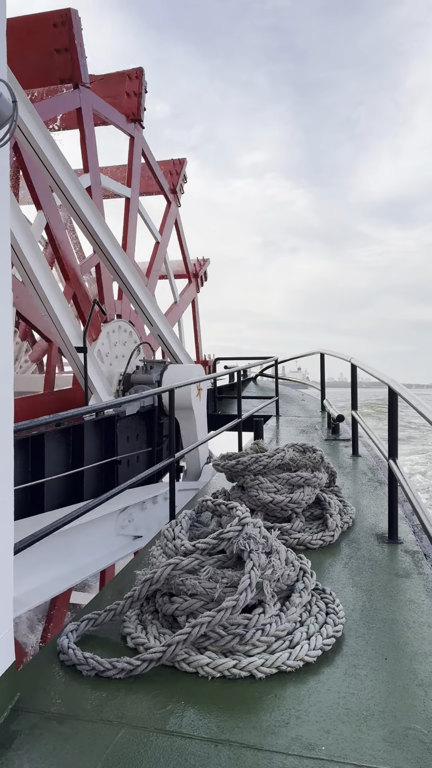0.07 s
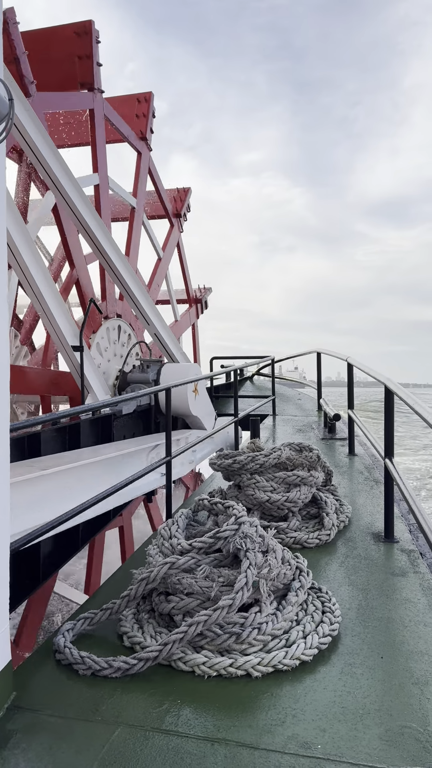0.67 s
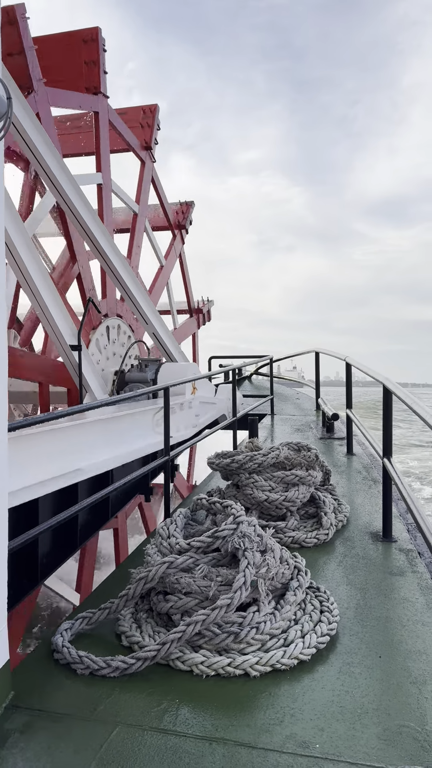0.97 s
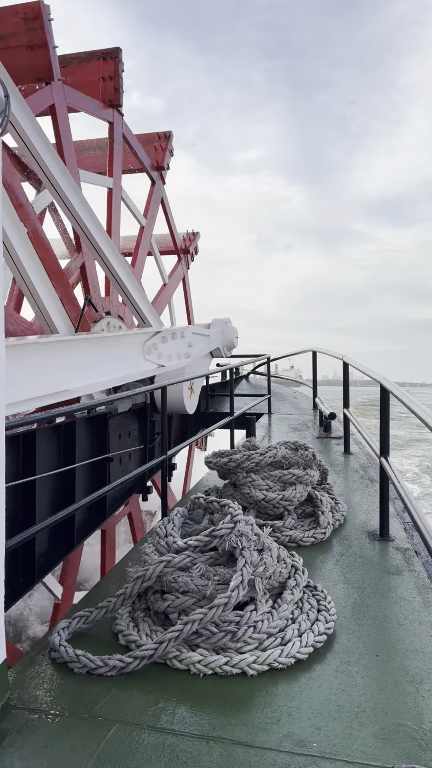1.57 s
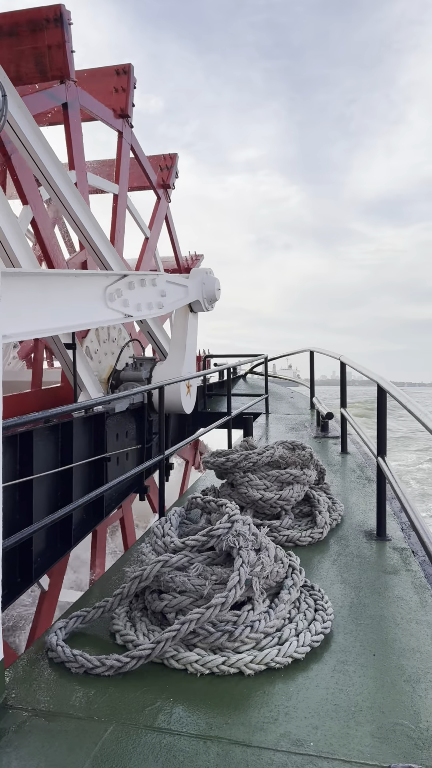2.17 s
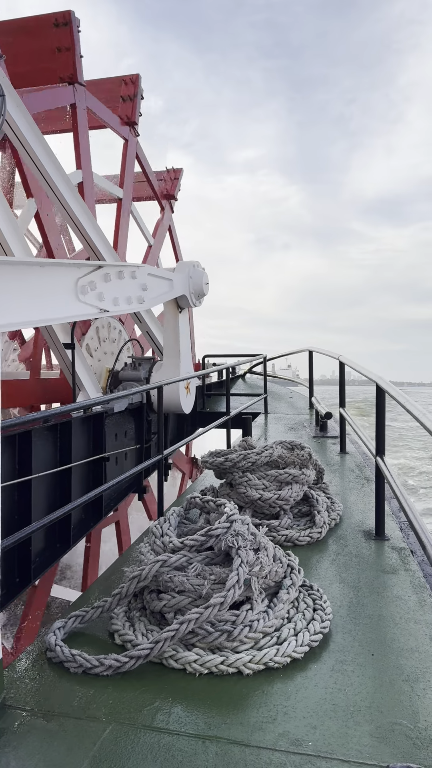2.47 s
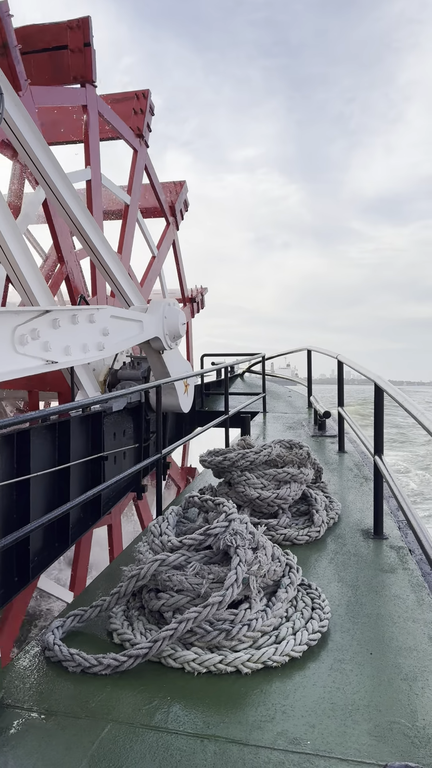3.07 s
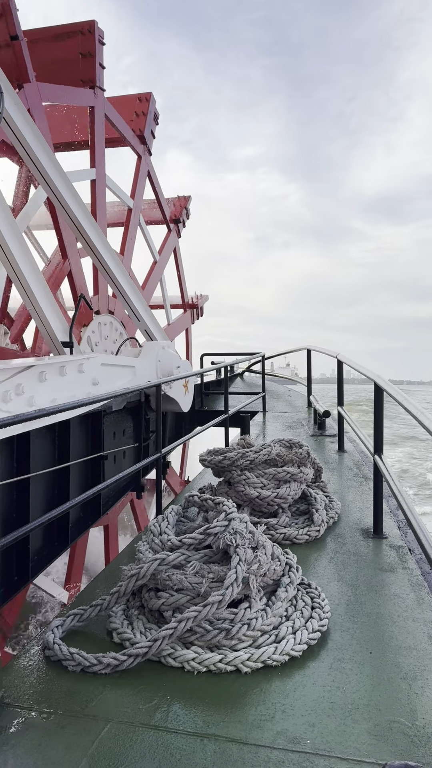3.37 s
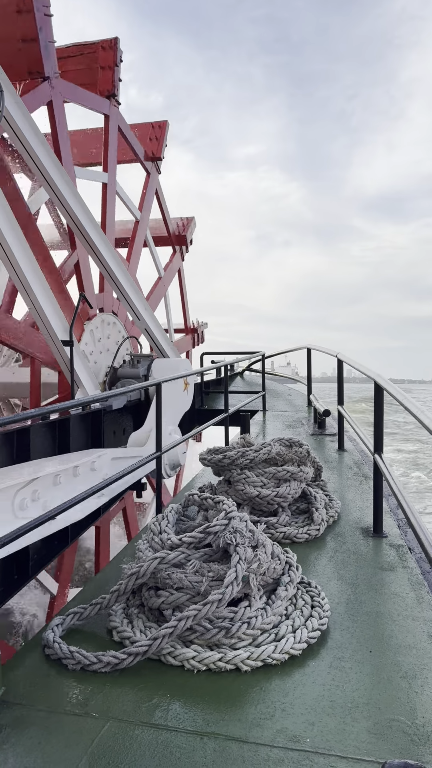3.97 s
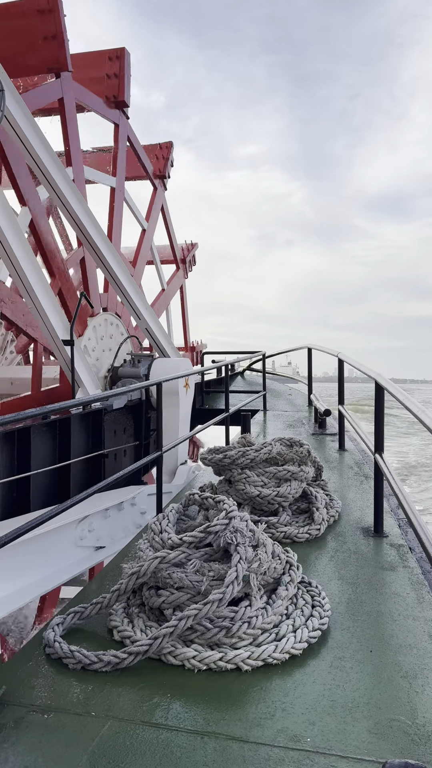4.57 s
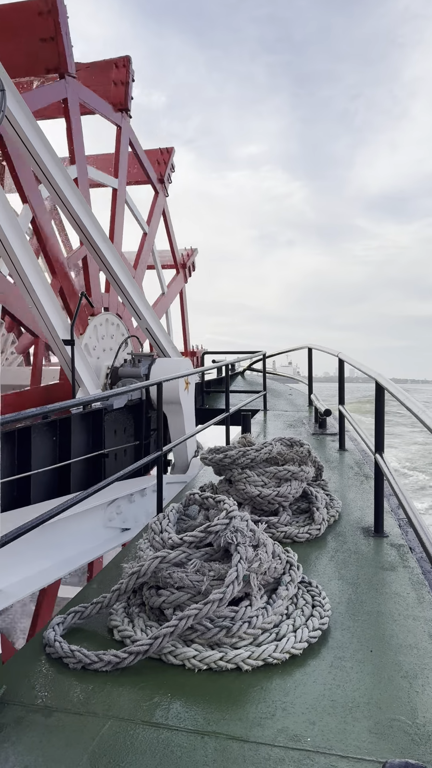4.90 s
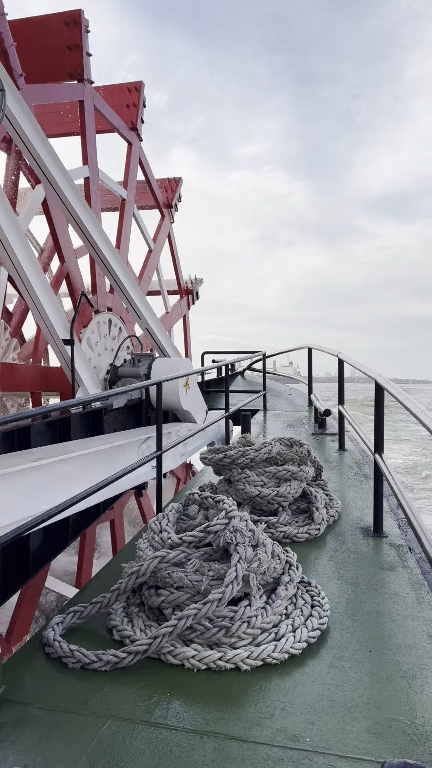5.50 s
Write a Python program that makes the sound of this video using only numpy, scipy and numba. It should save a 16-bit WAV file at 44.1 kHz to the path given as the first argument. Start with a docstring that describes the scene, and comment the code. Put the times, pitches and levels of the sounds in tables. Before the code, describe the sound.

Water rushes, gurgles and sprays without pause as a paddlewheel turns beside the deck of a riverboat, swelling gently with each board, roughly three a second. Gusts rumble and pop on a phone microphone outdoors, peaking about two thirds of the way through. A low engine drone runs below and drops back near the end, while a faint high ring surfaces now and then.

```python
"""A riverboat's paddlewheel, heard from the stern deck, slaps the river about three times a second.
Its boards plunge with a low gurgle, churn up a wash of resonating bubbles and throw a hissing spray;
a thin ring comes and goes. The hull carries the low drone of the machinery.
Gusts buffet the phone with turbulent pressure, and small eddies flutter and pop at its two ports."""
import sys
import numpy as np
from scipy import signal
from scipy.fft import rfft, irfft
from scipy.io import wavfile
from scipy.ndimage import uniform_filter1d
from numba import njit

SR = 44100
rng = np.random.default_rng(int(sys.argv[2]) if len(sys.argv) > 2 else 0)


def to_wav(s):
    """Save 16-bit WAV."""
    ch = np.atleast_2d(s).T  # columns
    pcm = np.round(np.clip(ch, -1, 1) * 32767)  # PCM
    wavfile.write(sys.argv[1], SR, pcm.astype(np.int16))


N = 253134
TIME = np.arange(N) / SR
FREQ = np.fft.rfftfreq(N, 1 / SR)

# Board slaps: t/s, wash swell/dB, spray swell/dB, spray swell of the first sheet of water/dB
BOARD_SLAPS = [(.3, 3, 0.6, 0.5), (.61, 2, 0.7, .6), (.98, 3, 1.5, 2), (1.32, 1.5, 1.5, 1.8),
               (1.7, 2, 1.4, 1), (2.02, 2.4, 1.2, 2), (2.37, 2, 2, 1.48), (2.72, 2, 2.3, 1),
               (3.05, 2, 2, 1.9), (3.39, 1.7, 1.8, 1.5), (3.76, 2.7, 0.6, 1.5), (4.09, 2.5, 0.5, -0.5),
               (4.385, 1.8, 2, -0.05), (4.75, 3, 1.6, 0), (5.08, 2.5, 0.5, 2), (5.42, 3, 2, 0.5),
               (5.68, 2, 2, -0.5)]
# Steady churn between strokes: t/s, wash level/dB, spray level/dB
CHURN_LEVELS = [(0, -35, -32.7), (1, -35, -32.5), (2.2, -35, -33), (3.1, -34.5, -33), (3.9, -34.5, -32.5),
                (4.5, -34.5, -32.5), (5.1, -36, -33.5), (5.74, -36, -32.5)]
# Low gurgle within the wash: t/s, gain/dB
GURGLE_GAIN = [(0, 0.5), (0.3, -7), (0.6, 1.5), (3.85, 0), (4.1, -2), (4.22, -1), (4.33, 0.5), (4.8, 1),
               (4.88, -2), (5.42, -0.5), (5.56, -4.5), (5.7, 1)]
# Spectra of the water: f/Hz, relative spectral level/dB
WASH_SPECTRUM = [(60, -37), (250, -6), (500, 1), (780, -1.9), (1050, -0.8), (1400, -3), (2000, -6),
                 (2750, -6), (3600, -10.5), (6000, -24.5), (12000, -49)]
SPRAY_SPECTRUM = [(1500, -25), (2800, -11), (3700, -3), (5000, -1.3), (6000, -.3), (7400, 0), (9200, -3.2),
                  (10500, -.3), (12000, -2), (13500, -5), (15000, -3.8), (17000, -6)]
PLUNGE_SPECTRUM = [(130, -12), (240, 4), (320, 3.5), (480, -2.5), (750, -13.5), (1100, -15), (1600, -26),
                   (3000, -65)]
# The wheel's sound at the two ports: f/Hz, coherence (0-1), phase lead of the left port/rad
PORT_COHERENCE = [(100, .9, 0), (500, .65, .4), (800, .65, .6), (1030, .6, -.4), (1300, .8, .2),
                  (2000, .97, 0), (2750, .55, 1.5), (3400, .28, 0), (4700, .28, 0), (5600, .82, -.55),
                  (9200, .82, -2.1), (11000, .97, -3.05), (13200, .96, -3.2), (15600, .78, -4.6)]
# Machinery lines: f/Hz, base rms level/dB, share of the heard level change followed (0-1)
ENGINE_LINES = [(87.4, -28, 1), (112.5, -38, 0.46), (133.9, -38, 0.5), (177.4, -33, 1), (271.6, -38, 1),
                (349.5, -40.5, 0.8)]
# Level of the drone as heard at the phone, dipping late: t/s, gain/dB
HEARD_DRONE_LEVEL = [(0, -1), (1.2, -0.5), (3.9, 3.5), (4.3, -7.5), (5.35, -7.5), (5.55, -11),
                     (5.74, -10.5)]
# Wind on the phone: t/s, relative buffeting level/dB
BREEZE_LEVEL = [(0, -47), (.15, -20.5), (.45, -18.5), (.62, -21), (.8, -25.5), (.92, -21.5), (1.2, -18),
                (1.65, -19), (1.95, -17), (2.15, -20), (2.35, -18), (2.7, -18), (3.35, -19), (3.7, -18.5),
                (4.02, -17.5), (4.15, -20.5), (4.19, -38), (4.3, -24.5), (4.5, -25.5), (5.2, -30.5),
                (5.4, -31.5), (5.57, -33.5), (5.65, -24), (5.74, -17)]
# Gusts and low swells: centre t/s, duration/s, relative level of wind buffets/dB, of plunging boards/dB
GUSTS_AND_PLUNGES = [(0.15, 0.0442, -22, -27), (0.412, 0.057, -23.5, -47), (0.617, 0.0654, -35.5, -25.5),
                     (0.977, 0.072, -20, -26), (1.145, 0.034, -18.5, -46), (1.292, 0.057, -14, -27),
                     (1.45, 0.1, -19.5, -36), (1.625, 0.095, -17.5, -30), (2.003, 0.062, -16, -33),
                     (2.537, 0.079, -20, -30), (2.827, 0.048, -19, -40), (3.088, 0.041, -24, -28),
                     (3.387, 0.066, -23, -22), (3.486, 0.07, -15.5, -21), (3.624, 0.04, -20.5, -30),
                     (3.774, 0.11, -11.5, -23), (3.905, 0.06, -15, -24.5), (4.049, 0.04, -20, -31),
                     (4.119, 0.042, -11.5, -30.5), (4.3, 0.04, -30, -26), (4.396, 0.043, -31.5, -25),
                     (4.591, 0.07, -18, -30), (4.666, 0.042, -18, -23.5), (4.741, 0.059, -19.5, -45),
                     (4.853, 0.023, -29.5, -27.5), (4.929, 0.025, -19, -25), (4.978, 0.038, -20.5, -29),
                     (5.124, 0.022, -17.5, -40), (5.186, 0.014, -24, -34), (5.275, 0.03, -23, -28.5),
                     (5.39, 0.05, -27, -46)]
# Spectra of the airflow: f/Hz, relative spectral level/dB
BUFFET_SPECTRUM = [(15, -40), (24, -27), (36, -1.5), (55, 3), (85, 1), (135, 1.5), (190, -3.5),
                   (250, -11.5), (400, -21.5), (900, -91)]
WHIRL_SPECTRUM = [(120, -4), (220, 0), (290, 6.5), (380, -1.5), (500, -6), (800, -8), (1400, -29),
                  (3000, -66)]
EDDY_SPECTRUM = [(20, -35), (40, -14), (65, 3.5), (160, 3), (260, 1.5), (450, -2.5), (800, -7),
                 (1200, -21.5), (1900, -61.5)]
# Eddy flurries: centre t/s, duration/s, relative level of slow eddies/dB, of quick eddies/dB
FLURRIES = [(0.36, 0.17, -21, -29), (0.53, 0.08, -27, -32), (1.17, 0.13, -35, -44), (1.5, 0.14, -31, -42),
            (2.3, 0.31, -29, -42), (2.49, 0.06, -27, -27.5), (2.63, 0.163, -23.5, -29.5),
            (2.906, 0.117, -23, -32), (3.045, 0.082, -21, -25), (3.191, 0.045, -16, -23.5),
            (3.31, 0.079, -18, -22), (3.48, 0.16, -32.5, -32), (3.787, 0.074, -26, -27),
            (4.077, 0.058, -19, -24), (4.162, 0.038, -29.5, -18.5), (4.253, 0.07, -24.5, -21),
            (4.38, 0.14, -28.5, -24), (4.722, 0.123, -28, -22), (4.833, 0.05, -32, -27),
            (5.02, 0.12, -35, -32), (5.36, 0.13, -30, -26), (5.58, 0.219, -30.5, -25.5)]
# Thin rings in the wheel's noise: centre t/s, f/Hz, level/dB
THIN_RINGS = [(.64, 2570, -42), (1.31, 2880, -42), (2.05, 2720, -41.5), (2.76, 2790, -48),
              (3.06, 2770, -41), (4.3, 2600, -44), (5.06, 2720, -41)]
# Whirls bursting on the ports: t/s, peak level/dB, centre f/Hz, half-width/cycles, slowing per cycle
WHIRL_POPS = [(1.414, -12, 312, 0.62, 0.18), (1.469, -11, 110, 1, .1), (3.406, -12.5, 282, 4.1, .05),
              (3.509, -7.5, 130, 0.56, 0.04), (3.76, -9, 354, 0.49, 0.25), (3.885, -7.5, 280, 0.92, 0.5),
              (3.911, -9, 376, 1.5, 0.5), (4.661, -11.5, 420, 1, 0.8), (4.776, -7.5, 620, 0.91, 0.76),
              (4.784, -17.5, 108.3, 1.2, 0.45), (5.271, -15, 443, 1.2, 0.61)]
# Extra sensitivity of the left port: f/Hz, left minus right level/dB
PORT_BALANCE = [(330, 0), (520, 2.5), (900, 3), (1150, 0)]


def undb(db):
    """Amplitude ratio of a level in decibels."""
    return 10 ** (np.asarray(db) / 20)


def curves(table):
    """A table's columns, interpolated linearly in time."""
    s, *columns = np.transpose(table)
    return [np.interp(TIME, s, c) for c in columns]


def over_frequency(table):
    """A table's columns, interpolated linearly in log frequency."""
    hz, *columns = np.transpose(table)
    return [np.interp(np.log(FREQ + 1), np.log(hz), c) for c in columns]


def unit(x):
    """Normalisation to rms 1."""
    return x / np.sqrt(np.mean(x ** 2))


def colour(x, spectrum, band_hz):
    """Spectral shaping of a white signal, leaving rms 1 in the given band."""
    gain = undb(over_frequency(spectrum)[0])
    inside = (FREQ > band_hz[0]) & (FREQ < band_hz[1])
    return irfft(rfft(unit(x)) * gain / np.sqrt(np.mean(gain ** 2 * inside)), N)


def below(x, hz):
    """Zero-phase low-pass filtering."""
    return irfft(rfft(x) / (1 + (FREQ / hz) ** 8), N)


def walk(rate_hz):
    """Band-limited random motion of rms 1."""
    return unit(irfft(rfft(rng.standard_normal(N)) * np.exp(-(FREQ / rate_hz) ** 2), N))


def turbulence(flicker_db, rate_hz):
    """Intermittency: turbulent noise comes in uneven puffs."""
    return rng.standard_normal(N) * undb(flicker_db * walk(rate_hz))


def steadied(x, span_s):
    """Division by the running rms evens out slow changes of strength and keeps the fine motion."""
    size = int(span_s * SR)
    return x / np.sqrt(uniform_filter1d(uniform_filter1d(unit(x) ** 2, size), size))


def at_ports(a, b):
    """Partial coherence: two independent sounds mix into a pair with a phase lag between the ports."""
    coherence, lead = over_frequency(PORT_COHERENCE)
    mid = rfft(a) * np.sqrt((1 + coherence) / 2)
    side = rfft(b) * np.sqrt((1 - coherence) / 2)
    turn = np.exp(1j * lead / 2)
    return irfft(np.array([(mid + side) * turn, (mid - side) / turn]), N)


@njit
def damped_sines(start, hz, size, cycles, glide):
    """Damped oscillators lose 40 dB over the given cycles while their pitch rises by the share glide."""
    out = np.zeros(N)
    for k in range(len(start)):
        length = int(cycles * SR / hz[k])
        step = 2 * np.pi * hz[k] / SR
        phasor = size[k] + 0j
        turn = np.exp(1j * step - np.log(100) / length)
        bend = np.exp(1j * step * glide / length)
        for i in range(start[k], min(start[k] + length, N)):
            phasor *= turn
            turn *= bend
            out[i] += phasor.imag
    return out


def bubbles(count, low_hz, high_hz, cycles, spread_db, glide):
    """Bubble resonance: each rings briefly, rising in pitch as it nears the surface."""
    when, pitch, chance = rng.random((count, 3)).T
    hz = low_hz * (high_hz / low_hz) ** pitch
    size = hz * undb(-spread_db * np.log(chance + .01))  # white on average
    return unit(damped_sines((when * N).astype(np.int64), hz, size, float(cycles), float(glide)))


def wash():
    """Air entrainment: the boards tear the river into foam and gurgling bubbles."""
    layers = [turbulence(flicker_db=.5, rate_hz=25)
              + undb(-7) * bubbles(18000, low_hz=400, high_hz=5000, cycles=30, spread_db=1.8, glide=.12)
              for _ in range(2)]
    foam = at_ports(*(colour(x, WASH_SPECTRUM, band_hz=(900, 2800)) for x in layers))
    gurgle = below(foam, hz=915)
    return foam - gurgle + undb(curves(GURGLE_GAIN)[0]) * gurgle


def spray():
    """Droplet impact: water thrown off the boards rains back as a dense fizz."""
    layers = [turbulence(flicker_db=.35, rate_hz=30)
              + undb(-7) * bubbles(30000, low_hz=2500, high_hz=15000, cycles=9, spread_db=2.1, glide=.1)
              for _ in range(2)]
    return at_ports(*(colour(x, SPRAY_SPECTRUM, band_hz=(4000, 10000)) for x in layers))


def paddlewheel(rise_s=0.055, fall_s=0.0994, sheet_lead_s=0.11, sheet_width_s=0.035):
    """Amplitude modulation of wash and spray: each board throws a sheet of water, then slaps in fully."""
    wash_db, spray_db = curves(CHURN_LEVELS)
    slap_s, wash_swell_db, spray_swell_db, sheet_db = np.transpose(BOARD_SLAPS)
    age = TIME - slap_s[:, None]  # one row a board
    sheet = np.exp(-((age + sheet_lead_s) / sheet_width_s) ** 2)
    slap = np.exp(-(age / np.where(age < 0, rise_s, fall_s)) ** 2)
    stir = slap + 0.434 * sheet
    foam = undb(wash_db + wash_swell_db @ stir + 0.29 * walk(rate_hz=12)) * wash()
    fizz = undb(spray_db + spray_swell_db @ slap + sheet_db @ sheet + 0.3 * walk(rate_hz=13)) * spray()
    return foam + fizz


def machinery(pitch_waver=0.01396, level_waver_db=2):
    """Structure-borne sound: the hull carries engine lines that waver in pitch and level."""
    out = np.zeros(N)
    heard_db, = curves(HEARD_DRONE_LEVEL)
    for hz, db, share in ENGINE_LINES:
        phase = 2 * np.pi * np.cumsum(hz * (1 + pitch_waver * walk(rate_hz=6.71))) / SR
        line = unit(np.sin(phase) * undb(level_waver_db * walk(rate_hz=3)))
        out += undb(db + share * heard_db) * line
    return out


def swells(centres_s, lengths_s, levels_db):
    """Incoherent addition: brief swells that rise, hold and fall away sum in power."""
    return sum(undb(db) ** 2 * np.exp(-2 * ((TIME - s) / (0.64 * length)) ** 4)
               for s, length, db in zip(centres_s, lengths_s, levels_db))


def wind(stiff_breeze_db=-17.5, deep_growth=0.34, whirl_growth=0.68):
    """Turbulent pressure: wind and gusts act on both ports alike, and whirls grow with the wind."""
    s, length, gust_db, _ = np.transpose(GUSTS_AND_PLUNGES)
    breeze = undb(curves(BREEZE_LEVEL)[0])
    force = np.sqrt(breeze ** 2 + swells(s, length, gust_db))
    buffet = colour(turbulence(flicker_db=1.1, rate_hz=23.6), BUFFET_SPECTRUM, band_hz=(30, 250))
    buffet = steadied(buffet, span_s=0.0923)
    deep = below(buffet, hz=80)  # grows faster than the rest beyond a stiff breeze
    buffet = buffet - deep + deep * np.maximum(force / undb(stiff_breeze_db), 1) ** deep_growth
    whirls = colour(turbulence(flicker_db=2.5, rate_hz=8.9), WHIRL_SPECTRUM, band_hz=(280, 650))
    whirls = steadied(whirls, span_s=0.13)
    return undb(-0.7) * force * buffet + undb(-17) * breeze ** whirl_growth * whirls


def plunges():
    """Water entry: plunging boards stir up brief swells of low, turbulent gurgle."""
    s, length, _, plunge_db = np.transpose(GUSTS_AND_PLUNGES)
    gurgle = colour(turbulence(flicker_db=4, rate_hz=30), PLUNGE_SPECTRUM, band_hz=(280, 650))
    return undb(-2) * np.sqrt(swells(s, length, plunge_db)) * steadied(gurgle, span_s=0.05)


def eddies(floor_db=-38.5):
    """Antiphase pressure: eddies, slow and deep or quick and bright, push one port and pull the other."""
    s, length, slow_db, quick_db = np.transpose(FLURRIES)
    flutter = colour(turbulence(flicker_db=2.5, rate_hz=34.5), EDDY_SPECTRUM, band_hz=(120, 700))
    flutter = steadied(flutter, span_s=0.15)
    slow = below(flutter, hz=228)
    quick = flutter - slow
    slow_gain = np.sqrt(undb(floor_db) ** 2 + swells(s, length, slow_db))
    quick_gain = np.sqrt(undb(floor_db) ** 2 + swells(s, length, quick_db))
    return undb(-2) * (slow_gain * slow + quick_gain * quick) * np.array([[1], [-1]])


def wheel_rings(half_width_s=0.234, waver_hz=70):
    """Random frequency modulation makes a thin, unsteady ring, which swells and fades at each return."""
    out = np.zeros((2, N))
    wavers = np.array([walk(rate_hz=130) for _ in range(2)])
    drift_cycles = waver_hz * np.cumsum(wavers, axis=1) / SR
    for s, hz, db in THIN_RINGS:
        envelope = undb(db) * np.exp(-2 * ((TIME - s) / half_width_s) ** 2)
        out += envelope * np.sqrt(2) * np.sin(2 * np.pi * (hz * TIME + drift_cycles))
    return at_ports(*out)


def pops():
    """Vortex passage: a whirl crossing the ports swings the pressure, each swing slower than the last."""
    out = np.zeros(N)
    for s, db, hz, cycles, slowing in WHIRL_POPS:
        near = np.abs(hz * (TIME - s)) < 10
        period_ratio = np.maximum(1 + slowing * hz * (TIME[near] - s), 1e-9)
        turns = np.log(period_ratio) / slowing
        swing = -np.sin(2 * np.pi * turns) * np.exp(-(turns / cycles) ** 2)
        out[near] += undb(db) * swing / swing.max()
    return out


def scene():
    """Superposition: the pressures of water, machinery and wind add at the two ports."""
    return paddlewheel() + wheel_rings() + machinery() + wind() + plunges() + eddies() + pops()


def record(dry, bass_hz=22, top_hz=15750):
    """Band limiting and saturation: the phone favours its left port in the midrange and rounds peaks."""
    lean_db, = over_frequency(PORT_BALANCE)
    balance = undb(np.array([lean_db, -lean_db]) / 2)
    low_cut = FREQ ** 4 / (FREQ ** 4 + bass_hz ** 4)
    heard = irfft(rfft(dry) * low_cut * balance, N)
    saturated = heard / (1 + heard ** 6) ** (1 / 6)
    high_cut = signal.ellip(10, .2, 80, top_hz, fs=SR, output="sos")
    return signal.sosfilt(high_cut, saturated)


dry = scene()
out = record(dry)
to_wav(out)
```